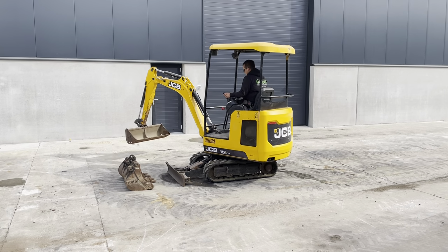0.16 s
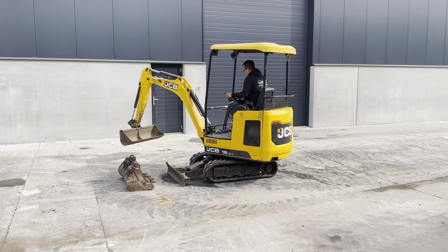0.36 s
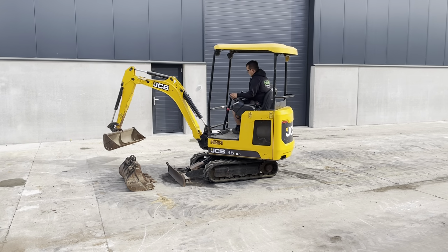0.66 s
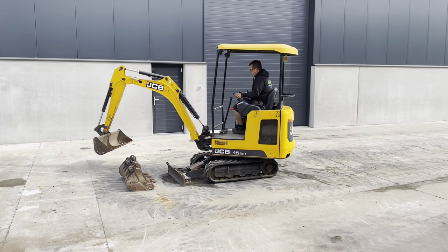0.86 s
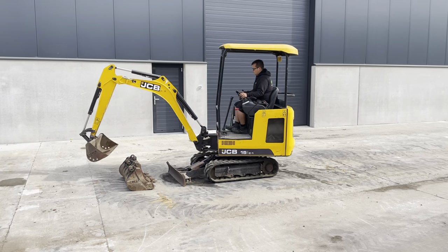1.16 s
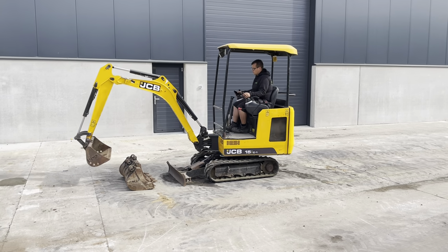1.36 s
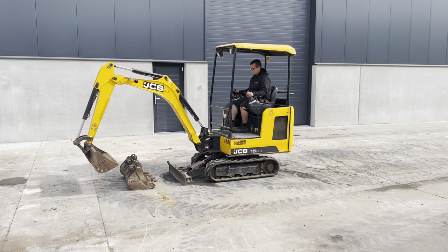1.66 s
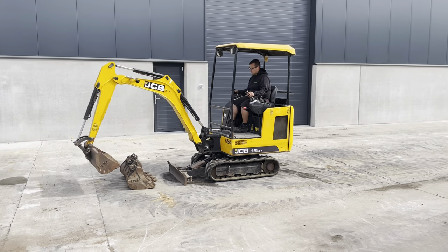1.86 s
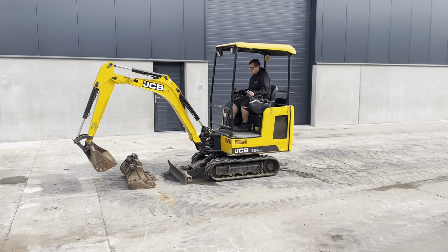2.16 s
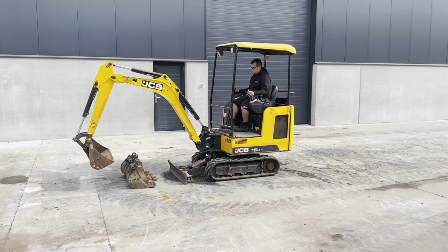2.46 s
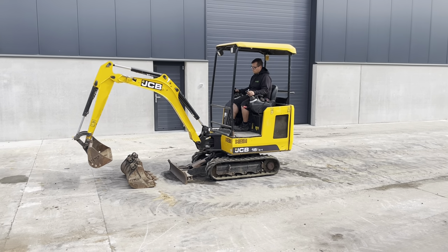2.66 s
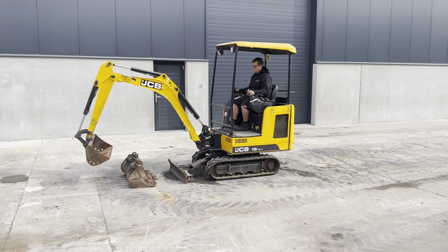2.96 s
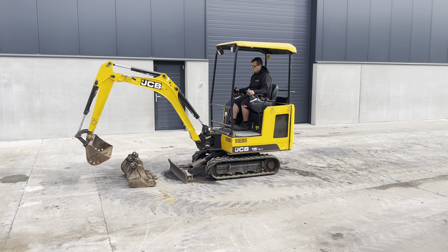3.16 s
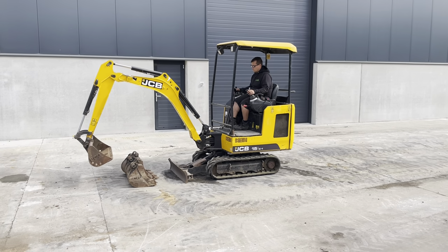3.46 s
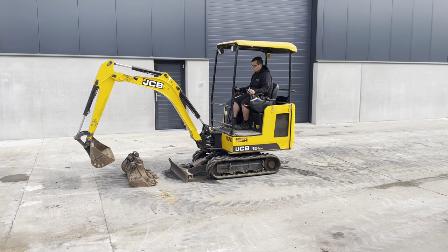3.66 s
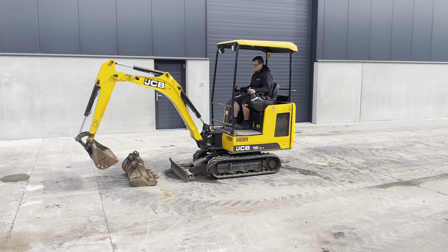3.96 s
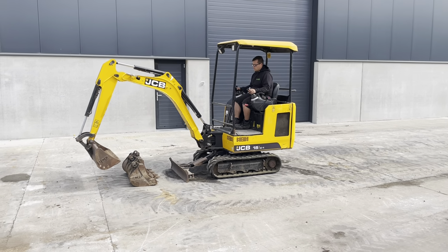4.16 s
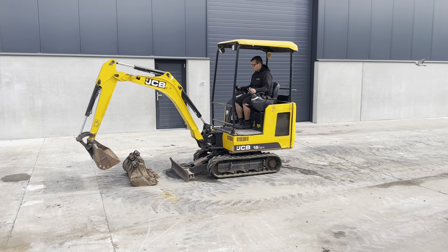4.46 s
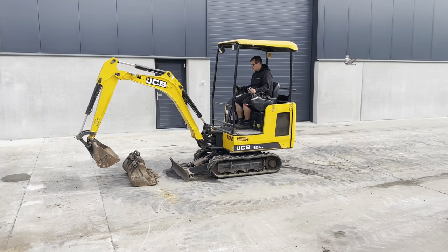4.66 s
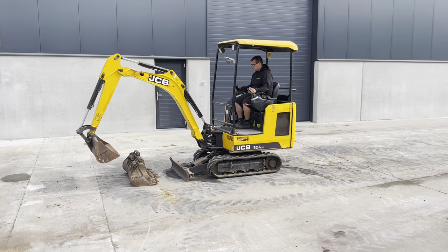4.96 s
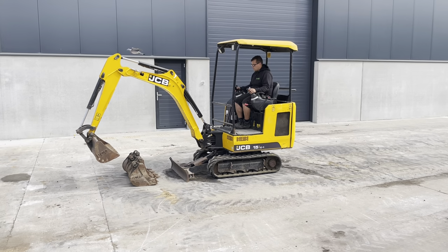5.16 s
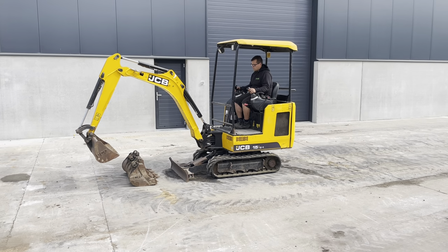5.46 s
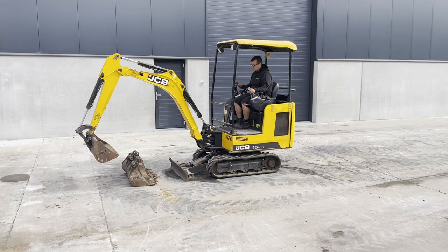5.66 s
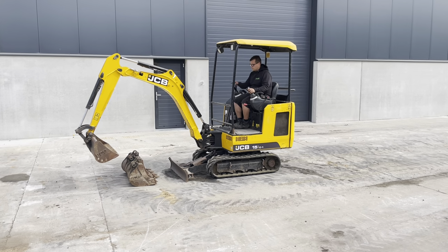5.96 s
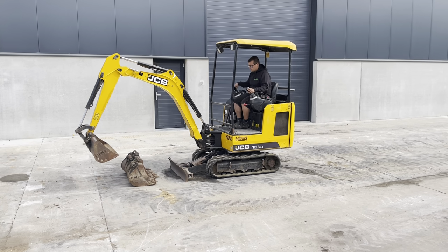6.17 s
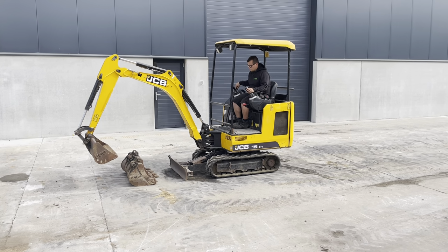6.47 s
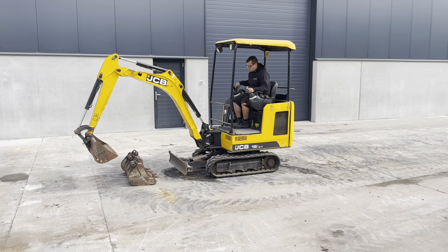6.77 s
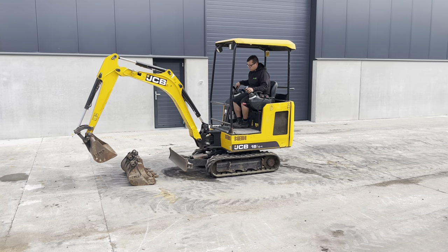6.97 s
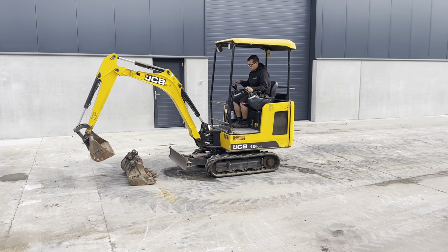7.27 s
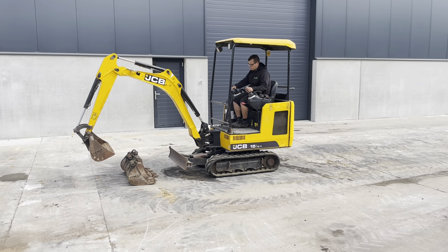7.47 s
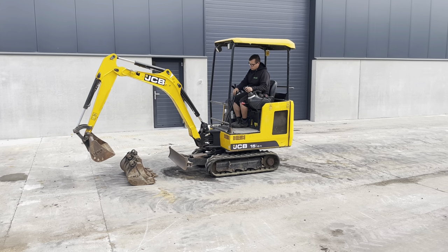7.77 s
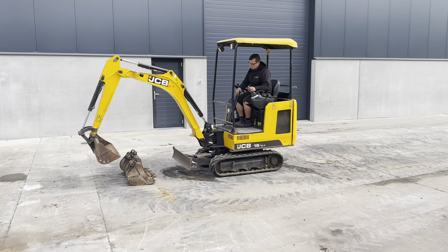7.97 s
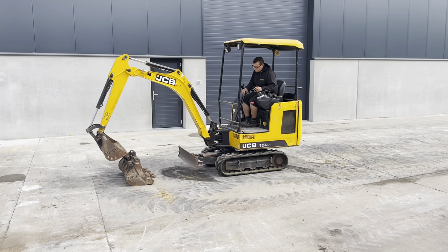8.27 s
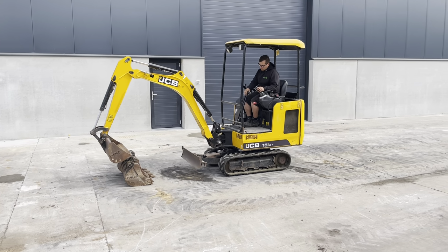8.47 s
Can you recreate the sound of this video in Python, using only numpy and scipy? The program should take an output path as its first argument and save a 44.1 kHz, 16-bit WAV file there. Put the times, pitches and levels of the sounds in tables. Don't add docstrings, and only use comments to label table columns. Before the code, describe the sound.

Outdoor mini digger engine chugs and hums, valves hissing with each lever pull, single clanks, then clattering and scraping steel buckets at the end.

```python
import sys
import numpy as np
from scipy import signal
from scipy.fft import rfft, irfft, next_fast_len
from scipy.io import wavfile
from scipy.ndimage import uniform_filter1d, map_coordinates

SR = 44100
rng = np.random.default_rng(int(sys.argv[2]) if len(sys.argv) > 2 else 0)


def materialize(psi):
    bounded = np.clip(np.atleast_2d(psi).T, -1, 1)
    quanta = np.round(bounded * 32767).astype(np.int16)
    wavfile.write(sys.argv[1], SR, quanta)


def decibels_to_gain(level_db):
    exponent = np.asarray(level_db, float) / 20
    return 10 ** exponent


N = 379701
T = np.arange(N) / SR
STRIDE = 64
STEPS = T[::STRIDE]


def unit(x):
    return x / np.sqrt(np.mean(x ** 2) + 1e-20)


def along(points, hz):
    f, v = np.transpose(points)
    return np.interp(np.log(hz + 1), np.log(f + 1), v)


def curve(rows):
    s, value = np.transpose(rows)
    return np.interp(T, s, value)


def knots(rate):
    return map_coordinates(rng.standard_normal(int(N * rate / SR) + 4), [STEPS * rate])


def wobble(rate):
    return np.interp(T, STEPS, knots(rate))


def ramp(start, length):
    return np.clip((STEPS - start) / length, 0, 1)


def filtered(x, response):
    m = next_fast_len(N + SR // 2)
    return irfft(rfft(x, m) * response(np.fft.rfftfreq(m, 1 / SR)), m)[..., :N]


def humps(modes, hz):
    return sum(decibels_to_gain(2 * db) / (1 + (2 * (hz - c) / w) ** 2) for c, w, db in modes)


def noise(gain):
    # f/Hz, likeness (0-1)
    alike = [(60, 0.98), (300, .96), (700, 0.91), (1500, 0.81), (3000, 0.85), (4200, 0.97), (6000, 0.73),
             (7800, 0.99), (8400, 0.99), (10000, 0.76), (14000, 0.92)]

    def shares(hz):
        turn = np.arccos(np.clip(along(alike, hz), -1, 1)) / 2
        return gain(hz) * [np.cos(turn), np.sin(turn)]

    common, apart = filtered(rng.standard_normal((2, N)), shares)
    return unit(np.array([common + apart, common - apart]))


def repeating(cycle, gain):
    frozen = rng.standard_normal(1024)
    return unit(filtered(frozen[(cycle % 1 * len(frozen)).astype(int)], gain))


def tone(cycles, db, drift=0.31, sway_db=2.5, rate=9):
    level_db = np.broadcast_to(db, T.shape)[::STRIDE] + sway_db * knots(rate)
    gain = np.interp(T, STEPS, decibels_to_gain(level_db))
    return np.sqrt(2) * gain * np.sin(2 * np.pi * (cycles + rng.random()) + drift * wobble(rate))


def levers():
    # start t/s, end t/s, hiss level at first/dB, settled hiss level/dB, settled firing rate f/Hz
    pulls = [
        (-.3, .47, -45, -45, 60.7),
        (.47, .7, -44.5, -44, 61.8),
        (.7, 1.48, -45.5, -44, 62.4),
        (1.95, 2.95, -49, -44.5, 61.45),
        (3.15, 4.06, -48.5, -52, 63.15),
        (4.51, 5.1, -50.5, -48.5, 62.05),
        (6.28, 7.09, -48.5, -45.7, 61.75),
        (7.71, 8.12, -44, -47, 62.1),
        (8.12, 8.27, -56, -54, 62.4),
        (8.27, 9, -47, -46, 62.0),
    ]
    spool_s, settle_s, leak_db = 0.078, 0.2, -70
    free_hz, sag_hz_per_db = 63.85, 0.1
    lag_s, ramp_s = 0.03, 0.11
    overshoot_hz, recover_s = 0.75, 0.2

    start, end, first_db, settled_db, rate_hz = np.transpose(pulls)[:, :, None]
    surge_db = (first_db - settled_db) * np.exp(-np.abs(STEPS - start) / settle_s)
    opening = ramp(start, spool_s) - ramp(end, spool_s)
    flow = decibels_to_gain(leak_db) + (opening * decibels_to_gain(settled_db + surge_db)).sum(axis=0)

    gone = ramp(end + lag_s, ramp_s)
    held = ramp(start + lag_s, ramp_s) - gone
    sag = (held * (free_hz - rate_hz + sag_hz_per_db * surge_db)).sum(axis=0)
    release = (gone * np.exp(-np.abs(STEPS - end - ramp_s) / recover_s)).max(axis=0)
    kick = release * (1 - held.sum(axis=0))
    firing_hz = free_hz - sag + overshoot_hz * kick
    return np.interp(T, STEPS, flow * decibels_to_gain(49)), np.interp(T, STEPS, firing_hz)


def exhaust(firing, strain, facing):
    # t/s, level/dB
    beat_db = [(0, -21.5), (.45, -27), (.75, -20), (1.7, -19.5), (2.45, -23.5), (3.3, -19.5), (5, -19),
               (6.1, -17), (6.8, -21.5), (7.45, -18), (8.61, -22.5)]
    # t/s, share lost (0-1), half-width/s
    nulls = [(.22, 1, 0.11), (1.2, 0.63, 0.27), (1.85, 0.2, .07), (2.2, .5, 0.073), (3.1, 0.06, .05),
             (3.86, 0.53, 0.25), (4.42, .25, 0.077), (4.8, 0.35, 0.13), (5.4, 0.45, .09),
             (5.88, 0.24, 0.11), (6.48, 0.7, 0.13), (7.26, 0.4, .06), (7.89, 0.93, 0.068), (8.4, 0.4, 0.12)]
    # t/s, level/dB
    octave_db = [(0, -28), (.15, -24.5), (.72, -25.5), (.88, -44), (1.55, -46), (1.8, -32.5), (8.61, -34)]

    left = np.ones(len(STEPS))
    for s, lost, width in nulls:
        left *= 1 - np.clip(lost, 0, 1) * np.exp(-((STEPS - s) / width) ** 2)
    beat = np.interp(T, STEPS, left) * tone(firing, curve(beat_db), drift=0.044, sway_db=-0.1, rate=16)
    strained_db = -4 * strain * (1 - facing)
    return beat + tone(2 * firing, curve(octave_db) + strained_db, sway_db=1.65)


def crank_lines(cycle, strain, facing):
    # multiple of the cycle, free level/dB, loaded level/dB, level with the tail facing/dB
    orders = [(5, -52, -49, -45), (7, -50, -51, -42), (8, -43, -45, -54), (9, -42, -43, -38),
              (9.5, -33.5, -39, -50), (10.3, -41, -34, -42), (11, -43, -47, -44), (12, -45, -43, -31.5),
              (12.2, -34, -33, -40), (13, -45, -52, -48), (15, -45, -42, -35), (16, -47, -46, -53),
              (18, -43, -46, -38), (21, -56, -54, -42), (24, -46, -55, -41), (28, -50, -54, -46),
              (31, -48, -41, -50), (35, -48, -54, -52), (39, -55, -55, -46), (41, -57, -60, -47),
              (43, -50, -56, -59), (49, -55, -59, -58), (52, -58, -52, -58), (53, -62, -49, -58),
              (96, -66, -64, -61)]
    lines = np.zeros(N)
    for k, free, loaded, tail in orders:
        side_on = free + strain * (loaded - free)
        lines += tone(k * cycle, (1 - facing) * side_on + facing * tail, drift=0.32, sway_db=1.5)
    return lines


def block_noise(firing, cycle, facing):
    knocks = [0.89, 0.12, 0.3]
    # f/Hz, level/dB per Hz
    boom_shape = [(25, -34), (45, -9.5), (80, -7.5), (140, -8.5), (205, -1), (250, -6.5), (300, -11.5),
                  (420, -12.5), (520, -45), (700, -120)]
    # f/Hz, level/dB per Hz
    growl_shape = [(150, -120), (330, -26), (430, -5.5), (530, -1.5), (660, 1), (760, -4.5), (1000, -5.5),
                   (1250, -10.5), (1500, -34), (2500, -120)]
    # f/Hz, level/dB per Hz
    clatter_shape = [(500, -120), (1050, -39), (1300, -3.5), (2250, -6.5), (2400, -7), (2650, -5),
                     (3400, -7.5), (5200, -10), (6500, -12.5), (8000, -8), (9000, -14), (10600, -21.5),
                     (12500, -26), (14300, -25), (15300, -27)]
    # f/Hz, width/Hz, gain/dB
    casting_modes = [(1320, 80, 2), (1735, 70, 7), (2010, 70, 4.5), (2130, 100, 7), (4200, 150, 2),
                     (4410, 60, 5), (4660, 90, 4), (6600, 90, 3), (10350, 150, 4)]
    # f/Hz, width/Hz, level/dB
    grille_modes = [(1540, 110, 0), (2000, 66, 1.5), (2730, 160, -0.5), (4160, 320, -5), (6300, 100, -7)]

    knock = np.take(knocks, firing.astype(int) % len(knocks)) * np.exp(-3.5 * (firing % 1))
    ticks = np.exp(-9 * ((2 * cycle + .3) % 1))
    knock, ticks = uniform_filter1d([knock, ticks], size=60)

    halfway = 4 * facing * (1 - facing)
    boom_db = -28.5 - facing + 0.5 * halfway
    growl_db = -33.5 + 0.5 * facing + 1.5 * halfway
    clatter_db = -37.5 - 1.5 * facing + 0.66 * halfway

    boom = noise(lambda hz: decibels_to_gain(along(boom_shape, hz))) * decibels_to_gain(boom_db + 1.0 * wobble(11))

    throat = lambda hz: decibels_to_gain(along(growl_shape, hz))
    growl = (1 + 0.42 * knock) * noise(throat) + 0.57 * repeating(cycle, throat)
    growl = unit(growl) * decibels_to_gain(growl_db + 1.6 * wobble(7))

    casting = lambda hz: decibels_to_gain(along(clatter_shape, hz)) * np.sqrt(1 + humps(casting_modes, hz))
    block = noise(casting) + 0.39 * repeating(cycle, lambda hz: casting(hz) / (1 + (hz / 3000) ** 4))
    grille = noise(lambda hz: np.sqrt(humps(grille_modes, hz)) * (hz < 9000))
    clatter = (1 + 0.6 * knock + 0.62 * ticks) * (block + 0.98 * facing * grille)
    return boom + growl + unit(clatter) * decibels_to_gain(clatter_db + 0.37 * wobble(16))


def pumps(firing, strain, load, facing):
    # idle level/dB, level with oil flowing/dB
    overtones = [(-78, -67), (-76, -60), (-53, -48), (-78, -62), (-80, -62), (-82, -68), (-80, -67),
                 (-82, -66), (-82, -65), (-84, -65), (-88, -68), (-88, -66), (-88, -69), (-88, -66),
                 (-88, -68), (-88, -70), (-84, -68), (-82, -68)]
    pistons, gear, teeth, belt = np.outer([9, 16, 8.062, 127.5], firing)
    song = tone(pistons, -50.5 + 13 * strain ** 2 - 12 * facing ** 4, sway_db=1.0)
    song += tone(gear, -46 + 7.9 * strain - 24 * facing * (1 - facing), sway_db=1.0)
    for k, (idle, flowing) in enumerate(overtones, start=14):
        level_db = idle + np.sqrt(load) * (flowing - idle) + 3.6 * wobble(1.28)
        song += tone(k * teeth, level_db, drift=1.9, sway_db=2.5, rate=60)
    belt_db = -60 + 12 * np.sqrt(load) * (1 - 0.47 * facing)
    return song + tone(belt, belt_db, drift=1.5, sway_db=3.5, rate=45)


def engine(firing_hz, load, facing):
    firing = np.cumsum(firing_hz) / SR
    cycle = firing / 3
    strain = np.clip((64 - firing_hz) / 2.4, 0, 1)
    lines = exhaust(firing, strain, facing) + crank_lines(cycle, strain, facing)
    return lines + pumps(firing, strain, load, facing) + block_noise(firing, cycle, facing)


def valves(load):
    # f/Hz, level/dB per Hz
    hiss_shape = [(4000, -120), (6500, -15), (7500, 7.5), (9000, -0.5), (11000, -0.5), (12000, -4),
                  (13500, -1), (14400, 0), (15500, -0.5)]
    # f/Hz, width/Hz, gain/dB
    slew_modes = [(8300, 130, 9.5), (8660, 80, 15), (9000, 60, 15), (11300, 80, 2), (12600, 100, 3),
                  (14800, 200, 6), (15600, 150, 6)]
    # f/Hz, width/Hz, gain/dB
    arm_modes = [(7640, 41, 7.8), (8100, 34, 5.1), (8500, 51, 4.2), (9000, 55, 8.3), (10300, 80, 4),
                 (11300, 40, 7.9), (12570, 70, 8.4), (13450, 120, 7.8), (15580, 120, 6)]
    slewing = np.clip((1.5 - T) / 0.066, 0, 1)

    def hiss(modes):
        return noise(lambda hz: decibels_to_gain(along(hiss_shape, hz)) * np.sqrt(1 + humps(modes, hz)))

    passages = slewing * hiss(slew_modes) + (1 - slewing) * hiss(arm_modes)
    return load * decibels_to_gain(-46.0 + 1.0 * wobble(14)) * passages


def bucket():
    # t/s, peak level/dB, thud/dB, brightness/dB, note of the struck spot f/Hz
    blows = [(1.61, -24.5, -5, -2, 829), (4.1396, -22.5, -6, -18, 666), (7.78, -39, 2, -16, 1980),
             (7.8122, -25.5, 1.5, -23, 1150), (7.901, -24.5, 2, -23, 2100), (7.9448, -30, 6, -14, 4650),
             (7.9812, -23.5, -4, -6.5, 1315), (8.0004, -22.5, 3.5, -19, 700), (8.0344, -25.5, 4, -19, 1080),
             (8.1077, -20, 4, -24, 700), (8.1944, -25.5, -4, -20, 1150), (8.2583, -24, 1, -29, 583),
             (8.2905, -16, -13, -25, 1120), (8.3279, -24, 2, -9, 3800), (8.365, -21, -4, -22, 545),
             (8.3944, -30, 5, -21, 2460), (8.5627, -20.5, -1.5, -6.5, 900)]
    # f/Hz, level/dB, t60/s
    bucket_modes = [(576, 0, .06), (826, -2, .08), (1147, -5, .08), (1322, -9, .07), (1793, -17, .07),
                    (2080, -6, .06), (2490, -9, .05), (2600, -13, .08), (3300, -13, .06), (3750, -14, .06),
                    (4470, -8, .08), (4590, -13, .06), (5470, -15, .07), (5910, -15, .06)]
    # t/s, level/dB
    scrape_db = [(7.74, -70), (7.8, -39.5), (7.95, -39.5), (8.05, -47), (8.15, -39), (8.25, -54),
                 (8.35, -58), (8.45, -44), (8.61, -43)]

    out = np.zeros(N + SR)
    t = np.arange(SR // 8) / SR
    hz, level, t60 = np.transpose(bucket_modes)[:, :, None]
    attack = 1 - np.exp(-t / 0.00049)
    for s, db, thud_db, bright_db, spot_hz in blows:
        share = level + rng.normal(0, 3.3, hz.shape)
        share = share + np.where(hz < 1400, thud_db + 5.5, 0) + np.where(hz > 3000, bright_db + 10, 0)
        mode_hz = hz * (1 + rng.normal(0, 0.0057, hz.shape))
        ring = (decibels_to_gain(share - 60 * t / t60) * np.sin(2 * np.pi * mode_hz * t)).sum(axis=0)
        spot = np.sqrt(700 / spot_hz) * decibels_to_gain(-60 * t / 0.083) * np.sin(2 * np.pi * spot_hz * t)

        grit = rng.standard_normal((3, len(t)))
        rattle = decibels_to_gain(thud_db + 6) * uniform_filter1d(grit[0], size=24)
        rattle += 1.12 * uniform_filter1d(grit[1], size=7)
        rattle += decibels_to_gain(bright_db + 3.5) * np.gradient(uniform_filter1d(grit[2], size=4))
        clank = 0.74 * ring + 1.45 * spot + 1.48 * rattle * decibels_to_gain(-60 * t / 0.11)
        out[round(s * SR):][:len(t)] += decibels_to_gain(db - 3.5) * clank * attack

    out[round(.108 * SR):][:len(t)] += decibels_to_gain(-29 - 60 * t / .05) * np.sin(2 * np.pi * 4200 * t)
    struck = signal.lfilter(*signal.butter(4, 6800 / (SR / 2)), out[:N])

    drag_modes = [(c, 90 + 0.038 * c, db) for c, db, _ in bucket_modes] + [(1570, 780, 2)]
    drag = unit(filtered(rng.standard_normal(N), lambda f: np.sqrt(humps(drag_modes, f))))
    return struck + drag * decibels_to_gain(curve(scrape_db) + 4.2 * wobble(30))


def wall(x):
    # f/Hz, t60/s
    decay = [(200, 0.25), (2000, 0.47), (10000, .12)]
    hz, t, z = signal.stft(rng.standard_normal((2, SR // 2)), SR, nperseg=256)
    tail = signal.istft(z * decibels_to_gain(-60 * t / along(decay, hz)[:, None]), SR, nperseg=256)[1]
    return signal.fftconvolve(np.pad(x, (500, 0))[None], tail / np.linalg.norm(tail[0]), axes=1)[:, :N]


def far_machine():
    return tone(155.4 * T, -44, rate=3.03)


def scene():
    # t/s, tail towards the camera (0-1)
    swing = [(0, 0.97), (.55, 0.87), (.9, 0.53), (1.45, 0.33), (1.6, 0.16), (7.7, 0), (8.0, 0.17),
             (8.61, 0.48)]
    load, firing_hz = levers()
    machine = engine(firing_hz, np.clip(load, 0, 1), curve(swing)) + valves(load)
    steel = bucket()
    return machine + steel + decibels_to_gain(-8.0) * wall(steel) + far_machine()


def roll_off(x):
    return signal.sosfilt(signal.butter(12, 15890, fs=SR, output="sos"), x)


def record(dry):
    # f/Hz, gap/radians
    port_gap = [(0, .07), (300, .1), (1460, -.3), (2760, .2), (5170, -.2), (6460, -.9), (7750, -2.7),
                (8400, -3.14), (8870, -3.4), (9300, -4.2), (10700, -5.9), (12300, -6.4), (12600, -7.1),
                (13700, -8.4), (14100, -9.35), (15400, -9.45), (15700, -9.9)]
    f, rad = np.transpose(port_gap)
    sides = np.array([[1], [-1]])
    top_hz = 15740
    ports = filtered(dry, lambda hz: np.exp(.5j * np.interp(hz, f, rad) * sides) * (hz < top_hz))
    return roll_off(ports)


dry = scene()
out = record(dry)
materialize(out)
```